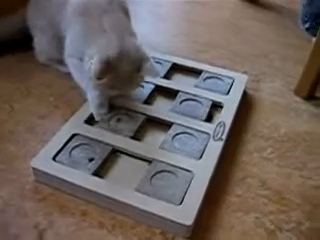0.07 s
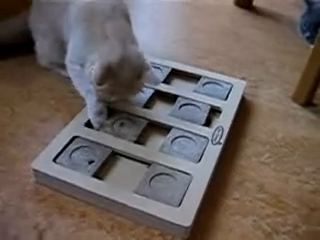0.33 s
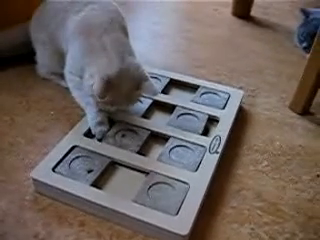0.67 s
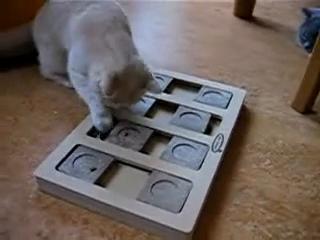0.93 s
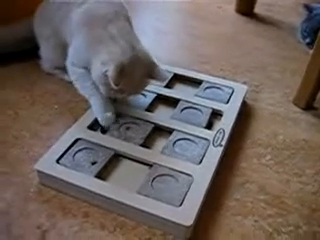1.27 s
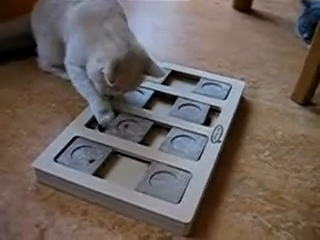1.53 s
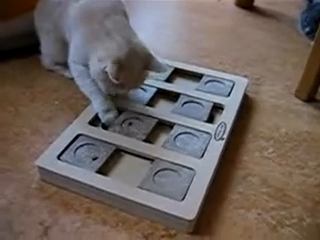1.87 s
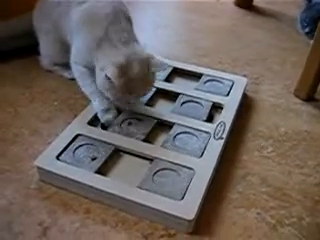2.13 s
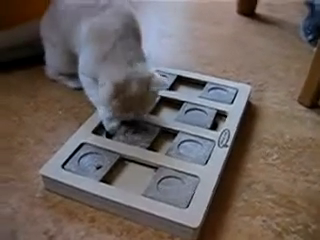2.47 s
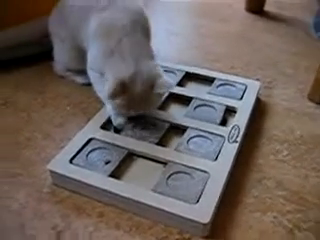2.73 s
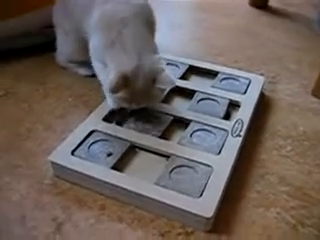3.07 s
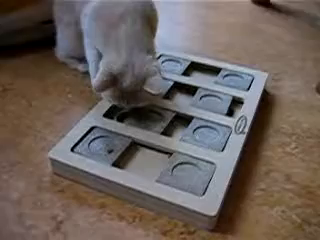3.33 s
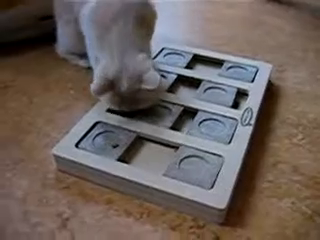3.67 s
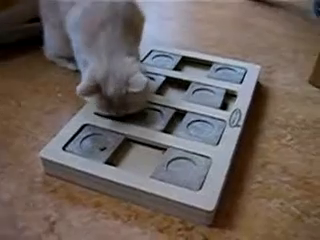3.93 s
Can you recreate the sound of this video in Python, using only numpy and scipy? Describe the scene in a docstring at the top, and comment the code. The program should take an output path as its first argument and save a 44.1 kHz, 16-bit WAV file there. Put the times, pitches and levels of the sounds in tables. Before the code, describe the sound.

A cat's paw scrapes and knocks sliding puzzle feeder tiles, with a sharp click and hiss.

```python
"""A cat paws at the sliding tiles of a puzzle feeder on a wooden floor, in a small room.
Over room rumble and a camera's steady hiss and thin whine, the camera's casing clicks twice.
From 0.3 s tiles knock in the hollow board while claws tick on edges and scrape in stick and slip.
A paw lands softly at 0.9 s, the casing snaps sharply at 1.3 s, and after 2 s the pawing thins out.
Near the end the paw settles again and a tile slides, with three light knocks."""
import sys
import numpy as np
from scipy import signal
from scipy.fft import rfft, irfft
from scipy.io import wavfile

SR = 44100
rng = np.random.default_rng(int(sys.argv[2]) if len(sys.argv) > 2 else 0)


def to_wav(sig):
    """Store sig (one row per channel, or 1-D mono) as 16-bit WAV at the path in sys.argv[1].

    Samples outside -1..1 are clipped; the rate is SR.
    """
    pcm = np.clip(np.atleast_2d(sig), -1, 1) * 32767
    pcm = np.round(pcm).astype(np.int16)
    wavfile.write(sys.argv[1], SR, pcm.T)  # frames by channels


N = 176400


def amp(db):
    """Decibels to gain."""
    return 10 ** (np.asarray(db) / 20)


def unit(x):
    """Scales to rms 1."""
    return x / np.sqrt(np.mean(x ** 2) + 1e-20)


def unit_peak(x):
    """Scales to peak 1."""
    return x / abs(x).max()


def seconds(size):
    """A time axis."""
    return np.arange(size) / SR


def read(points, hz):
    """Reads a curve on a log-frequency axis."""
    f, value = np.transpose(points)
    return np.interp(np.log(hz + 1), np.log(f + 1), value)


def add(mix, start, sound):
    """Mixes a sound in at a time in seconds."""
    part = mix[max(round(start * SR), 0):][:len(sound)]
    part += sound[:len(part)]


def colour(x, points):
    """Shapes x with an EQ curve, at rms 1."""
    gain = amp(read(points, np.fft.rfftfreq(N, 1 / SR)))
    return unit(irfft(rfft(x) * gain, N))


def lowpass(x, top_hz):
    """Gently darkens a sound."""
    return signal.lfilter(*signal.butter(2, top_hz, fs=SR), x)


def drift(rate_hz):
    """Slow random wander, rms 1."""
    slow = np.exp(-(np.fft.rfftfreq(N, 1 / SR) / rate_hz) ** 2)
    return unit(irfft(rfft(rng.standard_normal(N)) * slow, N))


def tones(lines, waver_hz=0.7):
    """Steady sines whose pitch wanders a little."""
    out = 0
    for hz, db in lines:
        pitch = hz + waver_hz * drift(rate_hz=1.81)
        out += amp(db) * np.sin(2 * np.pi * np.cumsum(pitch) / SR)
    return np.sqrt(2) * out


# Colour of the rumble and hiss. Each row: frequency in Hz, relative level in dB.
BED_EQ = [(15, -13.5), (45, 3), (65, -11), (110, -7.5), (200, -13.5), (420, -12), (650, -17.5), (1000, -17),
          (1500, -21.5), (2900, -20.5), (4300, -25), (5400, -28.5), (6200, -36), (7200, -47)]
# Mains hum in the room. Each row: pitch in Hz, level in dB before the fader.
MAINS_HUM = [(49.1, -60), (245.3, -62), (441.4, -67.5)]
# Fader moves on the rumble and hum. Each row: time in seconds, gain in dB.
BED_FADER = [(.05, -7.5), (.3, 1.5), (.6, 2.5), (1.29, 5), (1.349, -2), (2.101, 3), (4, 5.5)]


def background():
    """Room rumble and mains hum come up, dip once and creep back; the camera's hiss follows slightly."""
    noise = amp(-49.5) * colour(rng.standard_normal(N), BED_EQ)
    rumble = signal.sosfiltfilt(signal.butter(2, 700, fs=SR, output="sos"), noise)
    hiss = noise - rumble
    fader_db = np.interp(seconds(N), *np.transpose(BED_FADER))
    return (rumble + tones(MAINS_HUM)) * amp(fader_db) + hiss * amp(0.35 * fader_db)


# Tones of the camera's whine, low to high. Each row: pitch in Hz, level in dB before any fade.
WHINE_TONES = [(1717, -66.5), (1823, -54.5), (2062, -70.5), (3646, -63.5), (4280.2, -58.5), (6745, -74.5)]


def camera_whine(fade_in_s=0.79):
    """A thin whine: two steady low tones, and higher ones that fade in."""
    fade_in = 1 - np.exp(-seconds(N) / fade_in_s)
    return tones(WHINE_TONES[:2]) + tones(WHINE_TONES[2:]) * fade_in


def ring(modes, t, centre_hz=1, octaves=1, skirt=1):
    """A struck body's dying modes; those far from the blow's centre get only the skirt's share."""
    out = 0
    for hz, db, t60 in modes:
        share = skirt + (1 - skirt) * np.exp(-(np.log2(hz / centre_hz) / octaves) ** 2)
        out += share * amp(db - 60 * t / t60) * np.sin(2 * np.pi * hz * t)
    return out


# Modes of the camera's casing. Each row: pitch in Hz, relative level in dB, 60 dB decay in seconds.
CASING_MODES = [(614, -1.5, 0.0083), (1110, -15, 0.02), (1950, -1, 0.0063), (2410, 5.5, 0.0055),
                (2780, 8.5, 0.0043), (4640, -17.5, 0.0046), (4770, 0.5, 0.0056), (5930, -6.5, 0.0061)]
# Casing clicks. Each row: start in seconds, ring level in dB, push level in dB, low-pass in Hz.
CASING_CLICKS = [(.0076, -6, -31, 4000), (0.0395, -16.5, -38, 2970), (1.325, -4.5, -8.5, 6400)]


def casing_clicks(rise_s=0.00037, push_s=0.00024, rattle_s=0.0075):
    """Dry clicks right at the microphone: a low push, a short ring, a rattle; light ones are duller."""
    out, t = np.zeros(N), seconds(2500)
    snap = ring(CASING_MODES, t) * (1 - np.exp(-t / rise_s))
    push = -t / push_s * np.exp(1 - t / push_s)
    for start, ring_db, push_db, top_hz in CASING_CLICKS:
        click = unit_peak(lowpass(snap, top_hz))
        loose = rng.standard_normal(len(t)) * np.exp(-t / rattle_s)
        rattle = signal.fftconvolve(click, loose / np.linalg.norm(loose))[:len(t)]
        add(out, start, amp(ring_db) * (click + amp(-10) * rattle))
        add(out, start - push_s, amp(push_db) * push)
    return out


# Reverb of the small room. Each row: frequency in Hz, 60 dB decay in seconds.
ROOM_DECAY = [(200, 0.16), (900, 0.32), (3000, 0.28), (7000, 0.23)]


def room(x, wet_db):
    """Adds a tail of dense reflections, each band dying at its own speed."""
    size = SR // 2
    reflections = rng.standard_normal(size) * (rng.random(size) < .1)
    reflections *= seconds(size) > .004  # pre-delay
    hz, t, bands = signal.stft(reflections, SR, nperseg=256)
    decay = amp(-60 * t / read(ROOM_DECAY, hz)[:, None])
    tail = signal.istft(bands * decay, SR, nperseg=256)[1]
    return x + amp(wet_db) * signal.fftconvolve(x, tail / np.linalg.norm(tail))[:N]


# Modes of the hollow board. Each row: pitch in Hz, relative level in dB, 60 dB decay in seconds.
BOARD_MODES = [(622, -4.5, 0.32), (798, -1.5, .22), (869, -5, 0.31), (960, -2.5, 0.27), (1033, -2.5, 0.16),
               (1167, -2.5, 0.19), (1302, -2.5, 0.11)]
# Colour of the dull contact noise. Each row: frequency in Hz, relative level in dB.
CONTACT_EQ = [(80, -19.5), (300, -3.5), (900, -3), (2000, 2), (5000, -22.5)]
# Tile knocks. Each row: start in seconds, level in dB, pitch of the air pocket under the tile in Hz.
TILE_KNOCKS = [(.3075, -27, 747), (.3145, -19.5, 832), (0.329, -29, 870), (.592, -22, 898),
               (.5975, -22.5, 1088), (.608, -28.5, 967), (.6125, -21, 993), (1.4424, -35.5, 1086),
               (1.468, -38, 847), (1.749, -38, 1014), (2.3095, -42, 703), (3.781, -33.5, 874),
               (3.8, -34.5, 1014), (3.886, -33, 985)]


def tile_knocks(rise_s=.0025, pocket_t60_s=0.025, contact_s=.005):
    """A tile bumps in its slot: contact noise, the air pocket's hollow note, then the board's ring."""
    out, contact_envelope, t = np.zeros(N), np.zeros(N), seconds(16000)
    attack = 1 - np.exp(-t / rise_s)
    for start, db, hz in TILE_KNOCKS:
        pocket = ring([(hz, 0, pocket_t60_s)], t)
        board = amp(-14) * ring(BOARD_MODES, t, hz, octaves=.14, skirt=.13)
        add(out, start, amp(db) * unit_peak(attack * (pocket + board)))
        add(contact_envelope, start, amp(db - 8) * attack * np.exp(-t / contact_s))
    contact = contact_envelope * colour(rng.standard_normal(N), CONTACT_EQ)
    return room(out + contact, wet_db=-8)


# Modes of a tile. Each row: pitch in Hz, relative level in dB, 60 dB decay in seconds.
TILE_MODES = [(2094, -13, 0.24), (2423, 2, 0.017), (2840, -6, .03), (3934, -4, 0.031), (4410, 1, 0.02),
              (5605, 5, 0.0086)]
# Colour of a claw's scratch. Each row: frequency in Hz, relative level in dB.
SCRATCH_EQ = [(200, -8), (700, 3.5), (1500, -8), (2400, 7.5), (3100, 7.5), (3700, 8.5), (5000, 5),
              (6200, -2), (7200, -3)]
# Claw ticks. Each row: start in seconds, level in dB, pitch of the struck edge in Hz.
CLAW_TICKS = [(0.315, -30.5, 1970), (0.6213, -29, 3360), (0.6255, -27, 3280), (0.6299, -31, 3940),
              (0.6617, -30, 3670), (0.8779, -32, 2650), (1.056, -26.5, 3720), (1.437, -31, 3280),
              (1.447, -33.5, 2320), (1.4609, -21.5, 3680), (1.474, -28.5, 2640), (1.5391, -30.5, 3670),
              (1.587, -30, 2650), (1.79, -30, 3590), (1.829, -21, 3760), (1.8319, -29.5, 2440),
              (2.3063, -32.5, 3700), (2.3114, -33, 2700), (2.3185, -35.5, 3190), (2.879, -38, 2630),
              (3.5995, -34.5, 2800), (3.771, -35.5, 3470)]


def claw_ticks(rise_s=0.0011, edge_t60_s=0.0093, crack_s=0.0041):
    """A claw catches an edge: a tiny crack, the edge's brief note and the fainter ring of the tile."""
    out, t = np.zeros(N), seconds(8000)
    attack = 1 - np.exp(-t / rise_s)
    scratch = colour(rng.standard_normal(N), SCRATCH_EQ)
    noise = unit(scratch + colour(rng.standard_normal(N), CONTACT_EQ))
    for start, db, hz in CLAW_TICKS:
        modes = np.array(TILE_MODES)
        modes[:, 0] *= 1 + .015 * rng.standard_normal(len(modes))  # each hit is slightly detuned
        edge = ring([(hz, 0, edge_t60_s)], t)
        tile = amp(-13.5) * ring(modes, t, hz, octaves=.4, skirt=.5)
        add(out, start, amp(db) * unit_peak(attack * (edge + tile)))
        crack = lowpass(noise[round(start * SR):][:len(t)], 1.7 * hz)  # duller on low edges
        add(out, start, amp(db - 6) * crack * np.exp(-t / crack_s))
    return room(out, wet_db=-10.5)


def stick_slip(grains_per_s=2600, spread_db=3.5):
    """Friction: a dense train of tiny impulses of uneven size."""
    size = amp(spread_db * np.minimum(rng.exponential(1, N), 4))
    return size * rng.choice([-1, 1], N) * (rng.random(N) < grains_per_s / SR)


def pressure(start, rise, fall):
    """Envelope of one stroke: the paw bears down, then eases off."""
    t = seconds(N) - start
    return np.clip(t / rise, 0, 1) * np.clip(1 - (t - rise) / fall, 0, 1) ** 1.12


# Colour of a sliding tile. Each row: frequency in Hz, relative level in dB.
SLIDE_EQ = [(80, -14.5), (300, -7), (600, 4), (850, 5), (1020, 3), (1450, -13), (2200, -8), (4000, -43)]
# Scraping strokes. Each row: start, rise and fall in seconds, claw level in dB,
# claw low-pass in Hz, sliding tile level in dB.
SCRAPE_STROKES = [(0.316, 0.01, 0.37, -52.5, 4470, -63), (0.599, 0.0057, 0.12, -42.5, 4550, -41),
                  (.7, 0.012, 0.14, -44.5, 4970, -60.5), (.868, 0.022, 0.097, -40.5, 4140, -48.5),
                  (.95, .02, 0.082, -43, 4030, -48), (1.02, 0.042, .17, -44, 6000, -73),
                  (1.221, 0.075, 0.016, -43.5, 4500, -60.5), (1.451, 0.0071, 0.22, -43.5, 6300, -52),
                  (1.71, 0.037, 0.092, -42.5, 5470, -53), (1.8, 0.068, 0.2, -47.5, 5000, -48),
                  (2.845, 0.034, 0.14, -46, 3920, -48.5), (3.684, 0.075, 0.31, -47, 3400, -43)]


def scrapes():
    """Each stroke scratches the surface and drags a tile that sets the hollow board ringing."""
    clumps = amp(2 * drift(rate_hz=41))  # the claw catches and skips
    scratch = colour(stick_slip(), SCRATCH_EQ) * clumps
    board = unit(signal.fftconvolve(stick_slip(), ring(BOARD_MODES, seconds(16000)))[:N])
    slide = unit(colour(stick_slip(), SLIDE_EQ) + amp(-2.5) * board)
    out = np.zeros(N)
    for start, rise, fall, claw_db, top_hz, tile_db in SCRAPE_STROKES:
        claw = unit(lowpass(scratch, top_hz))
        out += pressure(start, rise, fall) * (amp(claw_db) * claw + amp(tile_db) * slide)
    return room(out, wet_db=-9.5)


# Colour of a paw's rub. Each row: frequency in Hz, relative level in dB.
PAW_EQ = [(40, 0.5), (160, -2), (420, 4.5), (600, -6), (1200, -20.5), (3000, -36.5)]
# Paw landings. Each row: start, rise and fall in seconds, level in dB.
PAW_LANDINGS = [(.925, 0.03, 0.07, -38), (3.55, 0.051, 0.089, -51)]


def paw_landings():
    """The dull rub of a soft paw settling on the board."""
    envelope = sum(amp(db) * pressure(start, rise, fall) for start, rise, fall, db in PAW_LANDINGS)
    return colour(stick_slip(), PAW_EQ) * envelope


def scene():
    """The background, the camera's own noises and the cat at its feeder, mixed to mono."""
    backdrop = background() + camera_whine() + casing_clicks()
    cat = tile_knocks() + claw_ticks() + scrapes() + paw_landings()
    return (backdrop + cat)[None]


def record(dry, rolloff_hz=6115, band_limit_hz=7150, dc_offset=-0.027):
    """Rolls off the treble, shifts the zero line slightly and cuts the top end steeply."""
    soft = signal.sosfilt(signal.butter(10, rolloff_hz, fs=SR, output="sos"), dry)
    band_limit = signal.firwin(301, band_limit_hz, window=("kaiser", 9), fs=SR)
    return signal.oaconvolve(soft + dc_offset, band_limit[None], "same")


dry = scene()
out = record(dry)
to_wav(out)
```